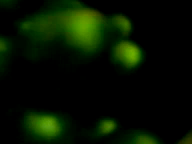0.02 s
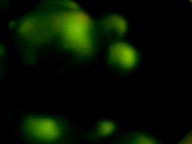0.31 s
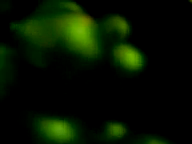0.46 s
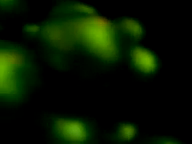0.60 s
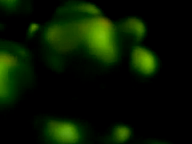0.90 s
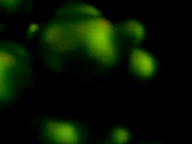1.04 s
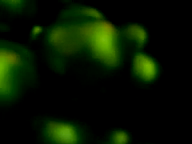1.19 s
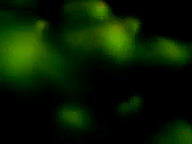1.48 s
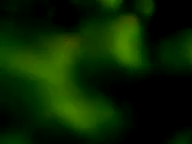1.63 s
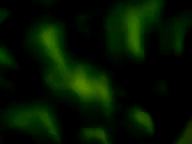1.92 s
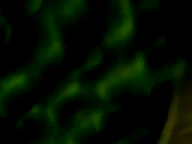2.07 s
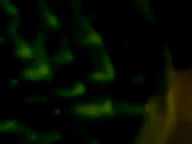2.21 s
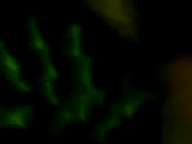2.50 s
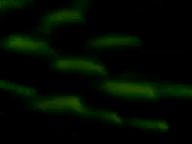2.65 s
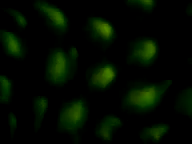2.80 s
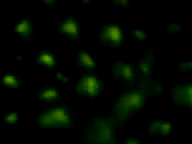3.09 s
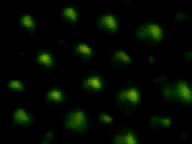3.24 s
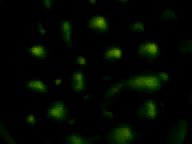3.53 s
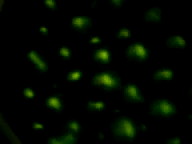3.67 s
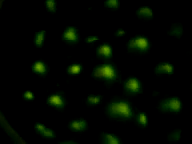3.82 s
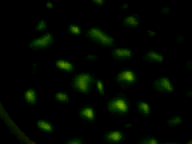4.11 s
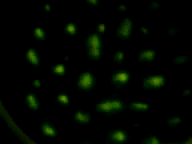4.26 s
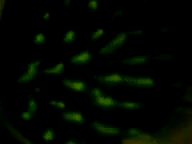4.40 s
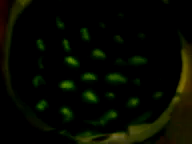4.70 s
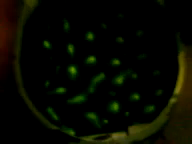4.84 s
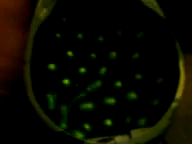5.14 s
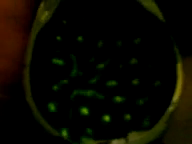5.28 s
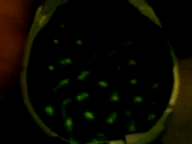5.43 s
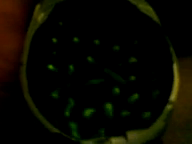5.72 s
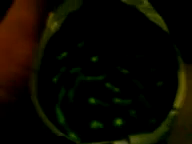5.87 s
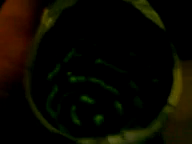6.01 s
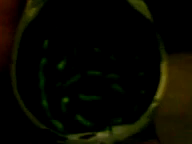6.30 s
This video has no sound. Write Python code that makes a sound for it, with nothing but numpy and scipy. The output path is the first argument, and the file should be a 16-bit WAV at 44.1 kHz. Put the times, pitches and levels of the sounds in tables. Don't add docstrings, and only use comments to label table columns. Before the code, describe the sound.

For the first 1.3 seconds it is nearly silent, with only low microphone hiss and still air. A very faint touch comes at 0.25 seconds, then a small click and a firmer, dull fingertip tap on hollow plastic around 1.05. At 1.35 a switch snaps brightly, and by 1.45 a small motor whirs into action, its paddle churning a load of paintballs. A loud, dense, hollow rattle fills the rest, made of countless quick contacts, gritty whirring and ball clacks. It is loose and bright at first, with especially hard knocks and slight overload around 1.9 to 2.3, then becomes more packed and shell-heavy. Irregular slumps, tiny lulls and heavy knocks continue, the hollow note creeping upward, until it cuts off still running near 6.4. The microphone is close, muffled and narrow-band, in a small room with a very short tail.

```python
import sys
import numpy as np
from scipy import signal
from scipy.fft import rfft, irfft, next_fast_len
from scipy.io import wavfile
from scipy.ndimage import map_coordinates

SR = 44100
rng = np.random.default_rng(int(sys.argv[2]) if len(sys.argv) > 2 else 0)


def pcm_store(signal):
    levels = np.round(np.clip(np.atleast_2d(signal), -1, 1) * 32767)
    wavfile.write(sys.argv[1], SR, levels.astype(np.int16).T)


def voltage_ratio(level):
    return 10 ** (np.asarray(level, float) / 20)


N = 280917
TIME = np.arange(N) / SR

# [f/Hz, level/dB per Hz]
HISS_SPECTRUM = [(18, -54.5), (30, -33), (367, -18), (442, -11), (521, -11), (589, -8), (853, -10),
                 (2750, -9), (3660, -9), (4060, -20.5), (5280, -53.5), (8930, -120)]
# [t/s, level/dB]
HUSH_LEVEL = [(0.0, -64.5), (0.47, -68), (0.954, -67), (1.118, -68.5), (1.372, -69), (1.4, -63)]
# [f/Hz, level/dB]
PASS_BAND = [(15, -48.5), (45, 3), (90, 3.5), (3000, -1), (3500, -5), (3900, -4), (4200, -6.5),
             (4500, -19), (4750, -120)]
# [f/Hz, t60/s]
ROOM_DECAY = [(300, 0.02), (2000, 0.085), (4000, 0.057)]
# [t/s, tick peak level/dB]
OVERLOADS = [(1.9558, -34), (1.96, -19), (2.158, -21), (2.1875, -19.5), (2.1897, -27.5), (2.2902, -19.5),
             (2.906, -21), (3.4915, -43.5), (6.3697, -29)]

# [t/s, peak level/dB, f/Hz, t60/s]
FINGER_TAPS = [
    (0.2434, -35, 538, 0.0092),
    (1.0509, -34, 513, 0.015),
    (1.054, -15.5, 462, 0.019),
    (1.062, -50.5, 450, 0.015),
]
# [f/Hz, level/dB]
FINGERTIP_SPECTRUM = [(120, -18), (330, -5), (750, -6), (1300, 9.5), (4000, -30)]
# [t/s, peak level/dB, t60/s, room level/dB]
SWITCH_CLICKS = [
    (.2412, -46, 0.0042, -23),
    (1.0308, -30.5, 0.0072, -24),
    (1.049, -45, .03, -17),
    (1.3255, -36.5, 0.011, -18),
    (1.348, -53, 0.0111, -25),
    (1.354, -18, 0.028, -11),
    (1.369, -40.5, .02, -11),
]
# [f/Hz, level/dB per Hz]
SWITCH_SPECTRUM = [(180, -76), (300, -57), (1010, -35), (1570, -17.5), (2330, -12), (3340, -15.5),
                   (4060, -52.5), (5280, -78), (8930, -120)]

# [t/s, level/dB]
CHURN_LEVEL = [(1.42, -33), (1.47, -24.5), (1.75, -25.5), (2.0, -23.5), (2.2, -20.5), (2.5, -23),
               (3.1, -24.5), (3.5, -23.5), (4.2, -23.5), (4.7, -26.5), (5.1, -24.5), (5.6, -26),
               (6.0, -24.5), (6.37, -24)]
# [f/Hz, pitch spread/share of f, how often/weight]
BALL_MODES = [(1439, 0.069, .33), (1650, 0.047, .09), (2011, .035, .36), (2432, 0.045, .12),
              (2831, .04, .04), (3167, 0.036, .06)]
# [t/s, tilt/dB per octave, shell f/Hz, shell level/dB, ball pitch/factor]
SETTLING_LOAD = [(1.42, 2, 703.7, -23, 1.2), (1.455, 0.5, 706, -22.5, 1.5), (1.49, -2.5, 696, -8, 1.15),
                 (1.6, -0.5, 676, -3, 1.18), (1.74, -0.5, 680, -15.5, 1.18), (1.9, 7, 680, -16, 1.24),
                 (2.2, 3, 673, -3, 0.981), (3.5, -5.5, 756, -0.5, 1.01), (4.8, -3, 779, 2, 1),
                 (5.5, -2.5, 798, 3.5, 1.02), (6.37, 2.5, 813, 2.5, 1.06)]
# [f/Hz, level/dB per Hz]
THUD_SPECTRUM = [(15, -54.5), (25, -35.5), (54, -38.5), (91, -1), (227, -6), (452, 12), (500, 12),
                 (650, -34), (1100, -120)]
# [f/Hz, level/dB per Hz]
WHIR_SPECTRUM = [(120, -43.5), (200, -28), (514, -20), (732, -6.5), (873, -3.5), (1110, -7.5), (1450, -7.5),
                 (2030, -8.5), (2780, -27), (3280, -13.5), (4060, -38), (5280, -77.5), (8930, -120)]
# [t/s, swell level/dB, jolt level on the shell/dB]
LOAD_SLUMPS = [(1.49, 6.5, 13), (1.58, 4.5, 13.5), (1.665, 5, 5), (1.685, 13, 13), (1.75, -5, -16),
               (1.821, 6.5, -4.5), (1.911, 5, 13.5), (1.968, 2, 17), (2.068, 1.5, 16), (2.169, 7, 18),
               (2.289, -2.5, 15), (2.578, 4, 3.5), (2.742, -5, 11), (2.918, 3.5, 12), (3.13, -8.5, 7.5),
               (3.178, 7.5, 16.5), (3.21, -4, -6), (3.498, 3, 15.5), (3.861, 0, -20.5), (3.958, 8.5, 10),
               (4.11, -3, 1.5), (4.301, 4, 13.5), (4.55, 3.5, 24), (4.59, -4, -27), (4.962, 3.5, 5),
               (5.221, -1, 14), (5.33, -4, 17.5), (5.641, -4.5, 17.5), (6.122, -4.5, -1), (6.34, -1.5, 14)]
SLUMP_RISE_S, SLUMP_FALL_S = 0.011, 0.015

# [peak t/s, level/dB]
WALL_HITS = [(1.9699, -9), (2.0686, -12), (2.159, -3.5), (2.1888, -7), (2.2102, -8.5), (2.2352, -9),
             (2.2659, -5.5), (2.2918, -15), (2.3275, -13), (2.4189, -6), (2.7804, -12), (2.9065, -4),
             (2.916, -8), (3.084, -11), (3.2625, -6), (3.2946, -12.5), (3.4278, -10), (3.6101, -4.5),
             (4.0278, -5.5), (4.0876, -10), (4.1882, -12.5), (4.2346, -9.5), (4.2857, -7.5), (4.7597, -10),
             (4.8425, -10), (5.2774, -11), (5.3322, -6.5), (5.7598, -12), (6.2575, -5.5), (6.313, -13)]
# [peak t/s, level/dB]
FLOOR_HITS = [(1.5933, -11.5), (2.7098, -9.5), (2.7377, -8), (2.8587, -6), (2.9773, -9), (3.0516, -9),
              (3.4915, -5), (3.722, -9.5), (3.9552, -9), (4.6234, -12.5), (4.751, -5), (4.7919, -8),
              (4.8924, -8), (4.9313, -9.5), (4.9426, -10), (4.9645, -4), (5.0939, -7), (5.4193, -7.5),
              (5.4808, -7.5), (5.5487, -8), (5.6294, -10), (5.845, -7), (5.9149, -6), (5.9433, -14.5),
              (5.9576, -6.5), (6.0277, -8.5), (6.106, -5), (6.1219, -4.5), (6.1413, -6.5), (6.3408, -5.5)]
# [peak t/s, level/dB]
DULL_CLACKS = [(1.5468, -10.5), (1.6792, -14), (1.7345, -13.5), (1.801, -12.5), (1.9073, -6.5), (1.961, -4),
               (2.0417, -9.5), (2.1916, -2.5), (2.2347, -14), (2.2803, -9), (2.6441, -14), (2.909, -6.5),
               (2.9502, -9), (3.0163, -7), (3.2951, -9.5), (3.371, -12), (3.49, -12), (3.5891, -9.5),
               (4.0415, -11.5), (4.2733, -9.5), (4.4465, -10.5), (4.6048, -8.5), (4.7607, -14),
               (4.7915, -11.5), (4.843, -12.5), (5.3935, -8.5), (5.6675, -12), (5.7961, -16.5),
               (5.9404, -15), (6.3409, -12.5)]
# [peak t/s, level/dB]
SHARP_CLACKS = [(1.4854, -12), (1.5894, -18.5), (1.7018, -10), (1.8229, -12), (1.9306, -9), (1.9909, -2.5),
                (2.0312, -13), (2.0628, -9), (2.1804, -8.5), (2.292, -3.5), (2.3222, -7.5), (2.3726, -11.5),
                (2.5012, -8.5), (2.5413, -10.5), (2.7324, -4), (2.7541, -7.5), (2.7654, -11),
                (3.0798, -10.5), (3.4476, -9), (3.5753, -12.5), (3.9005, -6), (3.9137, -11), (3.9949, -13),
                (4.0801, -13.5), (4.2322, -9.5), (4.5326, -11.5), (4.75, -11), (5.4398, -10),
                (5.5302, -14.5), (6.1163, -11)]
SHELL_GRAZES = [1.9609, 2.1815, 2.5014, 2.58, 2.6132, 2.9505, 3.2398, 3.4472, 3.5042, 3.5444, 3.6723,
                3.8027, 3.8427, 3.8786, 4.0446, 4.1459, 4.3977, 4.5006, 4.5376, 4.7748, 5.1359, 5.216,
                5.3948, 5.4618, 5.6041, 5.6641, 5.775, 5.9751, 6.1666, 6.2014]
BALL_GRAZES = [1.5636, 1.7884, 2.0977, 2.4409, 2.527, 2.8018, 3.4736, 3.5417, 3.6112, 3.784, 3.9484, 4.1117,
               4.1448, 4.2045, 4.3395, 4.3846, 4.6662, 4.8768, 4.9598, 5.1341, 5.2772, 5.3248, 5.4812,
               5.5484, 5.7347, 5.8448, 6.1482, 6.2387, 6.3154]
WALL_HZ, FLOOR_HZ, SHELL_GRAZE_HZ = 680, 857.5, 736
DULL_HZ, SHARP_HZ = 1433, 2028
SHELL_GRAZE_DB, BALL_GRAZE_DB, FORCE_SCATTER_DB = -12.5, -15, 2.5
PITCH_SCATTER = 0.034


def unit(x):
    return x / np.sqrt(np.mean(x ** 2) + 1e-20)


def along(points, hz):
    f, value = np.transpose(points)
    return np.interp(np.log(hz + 1), np.log(f + 1), value)


def curves(rows, s):
    t, *columns = np.transpose(rows)
    return [np.interp(s, t, column) for column in columns]


def wobble(rate, s):
    knots = rng.standard_normal(int(N * rate / SR) + 4)
    return map_coordinates(knots, [s * rate])


def coloured(x, spectrum):
    size = next_fast_len(len(x) + 8192)
    gain = voltage_ratio(along(spectrum, np.fft.rfftfreq(size, 1 / SR)))
    return irfft(rfft(x, size) * gain, size)[:len(x)]


def impulses(s, force):
    return np.bincount((s * SR).astype(int), force, N)[:N]


def rings(s, gain, hz, t60, attack, size):
    t = np.arange(size) / SR
    s, gain, hz, t60 = (np.broadcast_to(v, np.shape(s))[:, None] for v in (s, gain, hz, t60))
    shape = voltage_ratio(-60 * t / t60) * (1 - np.exp(-t / attack)) ** 2
    wave = gain * shape / shape.max(1, keepdims=True) * np.sin(2 * np.pi * hz * t)
    start = (s * SR).astype(int) - shape.argmax(1)[:, None]
    at = start + np.arange(size)
    return np.bincount(at.ravel(), wave.ravel(), N + SR)[:N]


def background():
    level_db = curves(HUSH_LEVEL, TIME)[0] + 1.2 * wobble(30, TIME)
    return voltage_ratio(level_db) * unit(coloured(rng.standard_normal(N), HISS_SPECTRUM))


def room(x):
    hz, t, z = signal.stft(rng.standard_normal(SR // 4), SR, nperseg=256)
    decay = voltage_ratio(-60 * t / along(ROOM_DECAY, hz)[:, None])
    tail = signal.istft(z * decay, SR, nperseg=256)[1]
    delayed = np.pad(x, (300, 0))
    return signal.fftconvolve(delayed, tail / np.linalg.norm(tail))[:N]


def finger():
    s, db, hz, t60 = np.transpose(FINGER_TAPS)
    direct = coloured(rings(s, voltage_ratio(db), hz, t60, 0.0012, size=1500), FINGERTIP_SPECTRUM)
    to_room = np.zeros(N)
    t = np.arange(2000) / SR
    for s, db, t60, room_db in SWITCH_CLICKS:
        burst = coloured(rng.standard_normal(len(t)), SWITCH_SPECTRUM)
        burst *= voltage_ratio(-60 * t / t60) * (1 - np.exp(-t / 0.0011)) ** 2
        burst *= voltage_ratio(db) / np.abs(burst).max()
        start = round(s * SR)
        direct[start:][:len(t)] += burst
        to_room[start:][:len(t)] += voltage_ratio(room_db) * burst
    return direct + room(to_room)


def grazes(s, db):
    return np.c_[s, db + FORCE_SCATTER_DB * rng.standard_normal(len(s))]


def struck(places):
    rows = []
    for hits, hz in places:
        pitch = hz * np.exp(PITCH_SCATTER * rng.standard_normal(len(hits)))
        rows.append(np.c_[hits, pitch])
    return np.concatenate(rows).T


def shell_booms(booms):
    s, db, hz = booms
    hz = hz * (curves(SETTLING_LOAD, s)[1] / 750) ** .45
    push = voltage_ratio(db) * rng.choice([-1, 1], len(s))
    ring = rings(s, voltage_ratio(db - 5), hz, .016, 0.0019, size=900) * (1 + 0.32 * wobble(500, TIME))
    thud = voltage_ratio(10.5) * coloured(impulses(s, push), THUD_SPECTRUM)
    rattle = voltage_ratio(3) * coloured(impulses(s - .001, push), WHIR_SPECTRUM)
    return ring + thud + rattle


def ball_clacks(clacks):
    s, db, hz = clacks
    hz = hz * curves(SETTLING_LOAD, s)[3]
    snap = voltage_ratio(db) * rng.choice([-1, 1], len(s))
    chatter = 1 + .5 * wobble(900, TIME)
    ring = chatter * rings(s, voltage_ratio(db - 3.0), hz, 0.01303, 0.001284, size=700)
    high = rings(s, 0.11 * snap, np.minimum(2.4 * hz, 3300), 0.0095, .0008, size=400)
    return ring + high + voltage_ratio(8.5) * coloured(impulses(s, snap), WHIR_SPECTRUM)


def contacts(count, spread_db, clump_db):
    s = np.sort(rng.uniform(CHURN_LEVEL[0][0], N / SR, count))
    db = spread_db * np.minimum(rng.exponential(1, count), 3.6)
    db += clump_db * np.minimum(wobble(25, s) + wobble(70, s), 1.8)
    return s, voltage_ratio(db) * rng.choice([-1, 1], count)


def slumps():
    s, swell_db, jolt_db = np.transpose(LOAD_SLUMPS)
    t = np.arange(0, N / SR + .01, .002)[:, None]
    rise = 1 + (t - s) / SLUMP_RISE_S
    fall = 1 - (t - s) / SLUMP_FALL_S
    ramp = np.clip(np.minimum(rise, fall), 0, 1)
    return [np.interp(TIME, t[:, 0], ramp @ db) for db in (swell_db, jolt_db)]


def surge(hard, lull_db, shower_db):
    s, db = hard[:2]
    hits = impulses(s, voltage_ratio(db + 6.0))
    t = np.arange(3000) / SR
    after = signal.fftconvolve(hits, np.exp(-t / 0.009))[:N]
    before = signal.fftconvolve(hits[::-1], np.exp(-t / 0.0078) * (t > .002))[:N][::-1]
    gather = signal.fftconvolve(hits[::-1], np.exp(-t / .016))[:N][::-1]
    return voltage_ratio(shower_db * np.tanh(after) - lull_db * np.tanh(before) + 2.8 * np.tanh(gather))


def churn(hard):
    level_db, = curves(CHURN_LEVEL, TIME)
    swell_db, jolt_db = slumps()
    ball_db = level_db + swell_db
    shell_db = ball_db + curves(SETTLING_LOAD, TIME)[2]
    both_db = (shell_db + ball_db) / 2
    thud_db = level_db - 22.5 + jolt_db
    grit_db = level_db - 19.5 + 2.2 * swell_db

    s, force = contacts(count=5000, spread_db=3.0, clump_db=1)
    draw = rng.standard_normal((len(s), 6))
    tilt_db, shell_hz = curves(SETTLING_LOAD, s)[:2]
    shell_hz = shell_hz * np.exp(.14 * draw[:, 0])
    shell_t60 = 0.024 * np.exp(0.84 * draw[:, 1])
    shell = rings(s, force, shell_hz, shell_t60, 0.000859, size=500)

    centre, spread, share = np.transpose(BALL_MODES)
    balls = np.zeros(N)
    for k in (2, 4):
        which = rng.choice(len(BALL_MODES), len(s), p=share / share.sum())
        hz = centre[which] * np.exp(spread[which] * draw[:, k])
        mode_db = tilt_db * np.log2(hz / 1500) + 0.44 * draw[:, k + 1]
        balls += rings(s, force * voltage_ratio(mode_db), hz, 0.026, 0.00025, size=330)

    rattle = coloured(impulses(s + 0.001018, force), WHIR_SPECTRUM)
    whir = coloured(rng.standard_normal(N), WHIR_SPECTRUM)
    whir *= voltage_ratio(6.6 * np.minimum(wobble(40, TIME), 1.4))
    grit = rings(s, force, 3250 * np.exp(0.09 * draw[:, 5]), .007, .0004, size=300)
    thud = coloured(impulses(s, force), THUD_SPECTRUM)

    mix = voltage_ratio(shell_db - 5.0) * unit(shell)
    mix += voltage_ratio(ball_db - 5.5) * unit(balls)
    mix += voltage_ratio(grit_db - 10) * unit(grit)
    mix += voltage_ratio(thud_db - 2) * unit(thud)
    mix += voltage_ratio(both_db - 9.5) * unit(rattle)
    mix += voltage_ratio(both_db - 6.0) * unit(whir)
    motor_start = np.clip((TIME - CHURN_LEVEL[0][0]) / 0.036, 0, 1)
    return motor_start * surge(hard, lull_db=4.5, shower_db=6) * voltage_ratio(-0.5) * mix


def scene():
    shell_grazes = grazes(SHELL_GRAZES, SHELL_GRAZE_DB)
    ball_grazes = grazes(BALL_GRAZES, BALL_GRAZE_DB)
    booms = struck([(WALL_HITS, WALL_HZ), (FLOOR_HITS, FLOOR_HZ), (shell_grazes, SHELL_GRAZE_HZ)])
    clacks = struck([(DULL_CLACKS, DULL_HZ), (SHARP_CLACKS, SHARP_HZ), (ball_grazes, SHARP_HZ)])
    load = churn(np.c_[booms, clacks]) + shell_booms(booms) + ball_clacks(clacks)
    return (load + voltage_ratio(-14.5) * room(load) + finger() + background())[None]


def low_pass(x):
    return signal.sosfilt(signal.butter(12, 15800, fs=SR, output="sos"), x)


def record(dry):
    rounded = dry[0] / (1 + np.abs(dry[0] / .74) ** 6) ** (1 / 6)
    narrow = coloured(rounded, PASS_BAND)
    s, db = np.transpose(OVERLOADS)
    crest = 1 - np.linspace(-1, 1, 6) ** 2
    ticks = np.convolve(impulses(s, voltage_ratio(db)), crest, "same")
    shaved = signal.lfilter(*signal.butter(2, 3000, "high", fs=SR), ticks)
    return low_pass((narrow + shaved)[None])


dry = scene()
out = record(dry)
pcm_store(out)
```